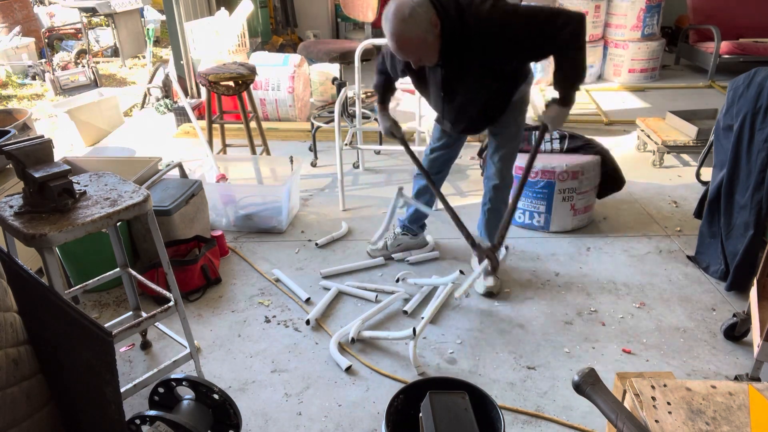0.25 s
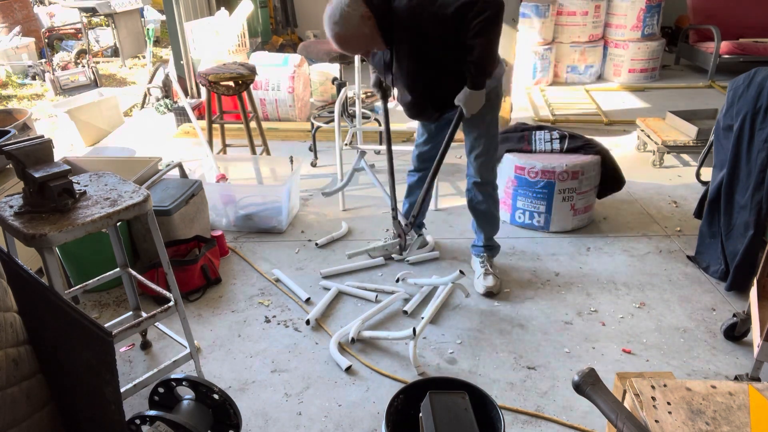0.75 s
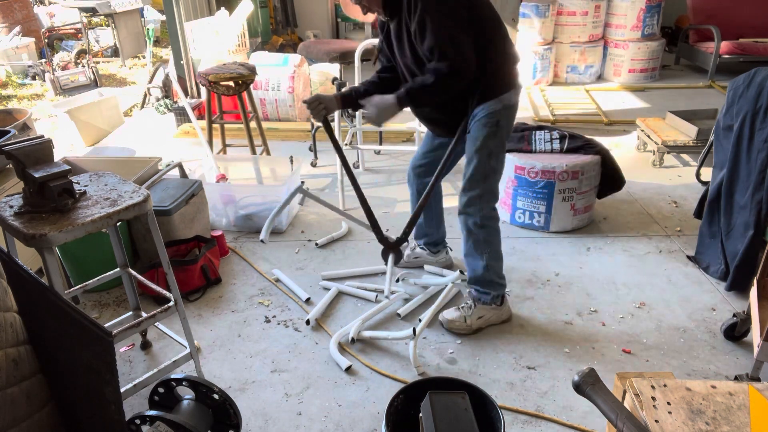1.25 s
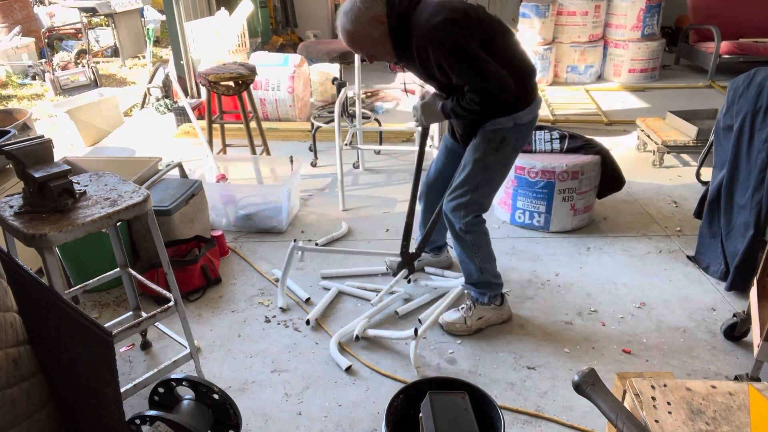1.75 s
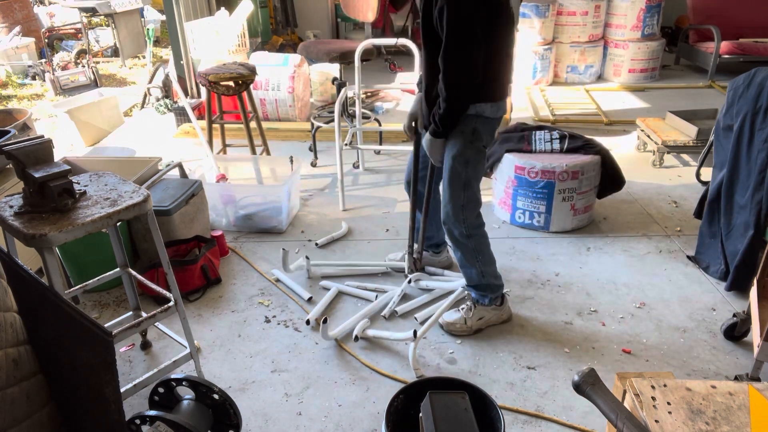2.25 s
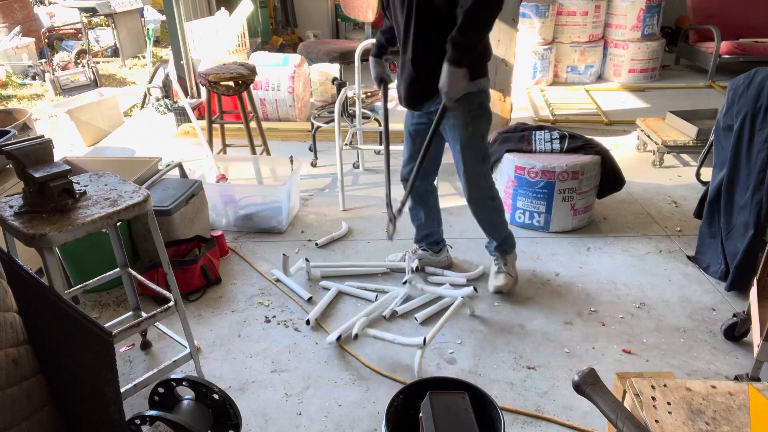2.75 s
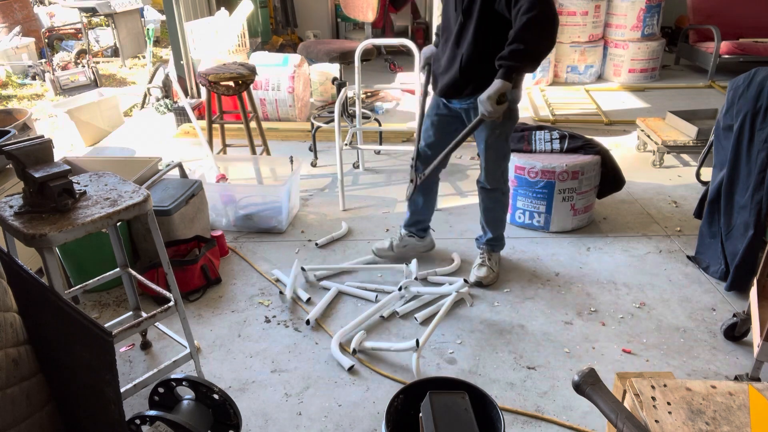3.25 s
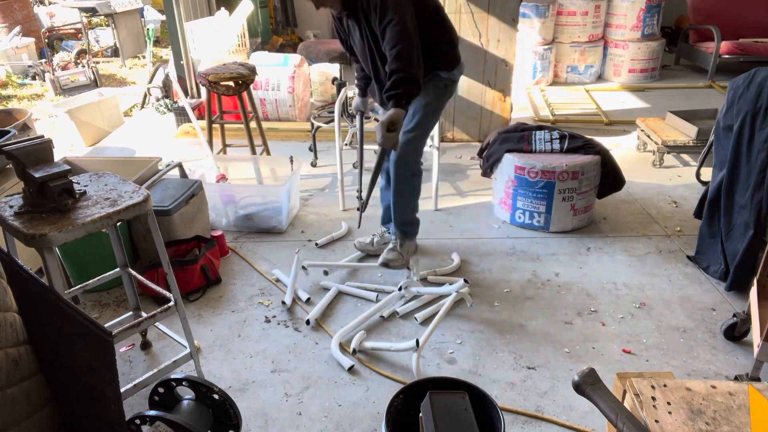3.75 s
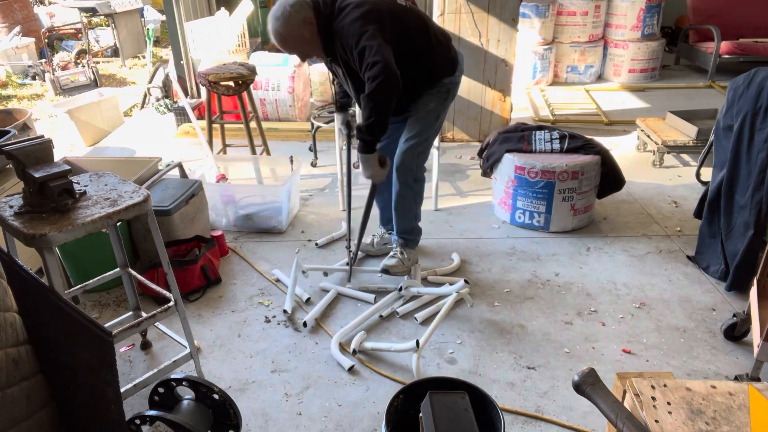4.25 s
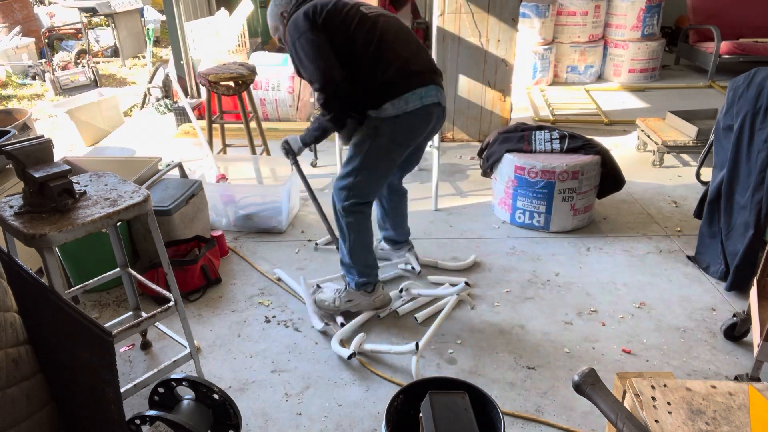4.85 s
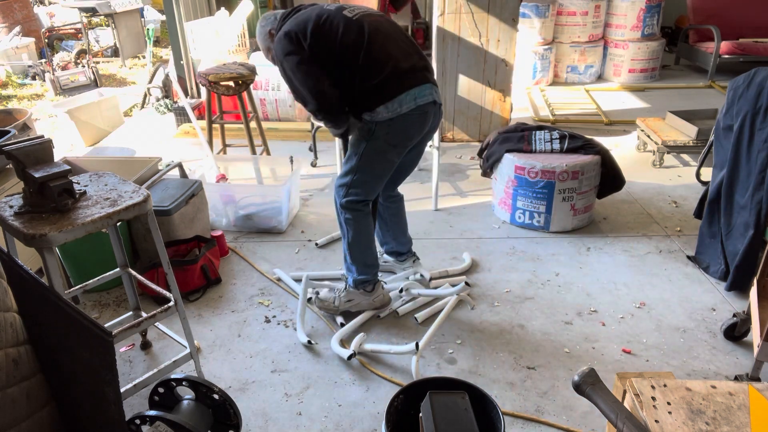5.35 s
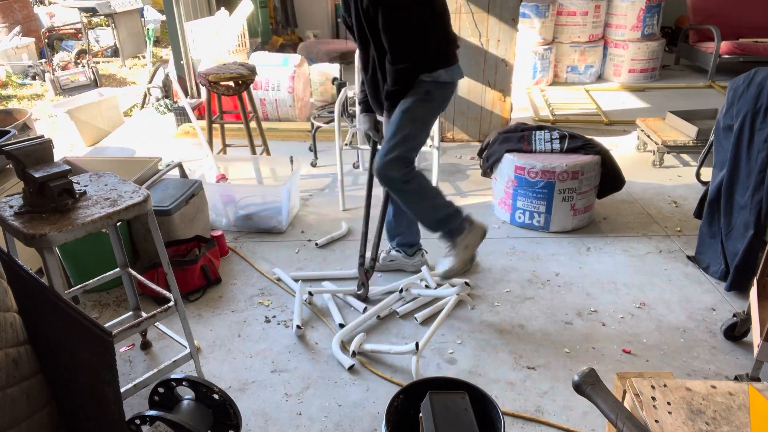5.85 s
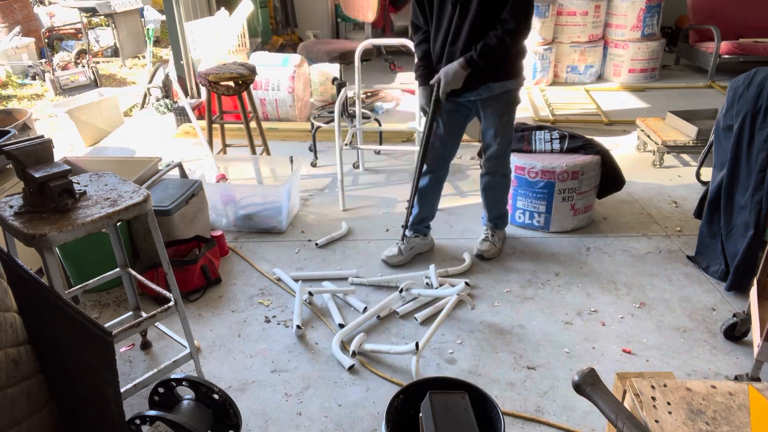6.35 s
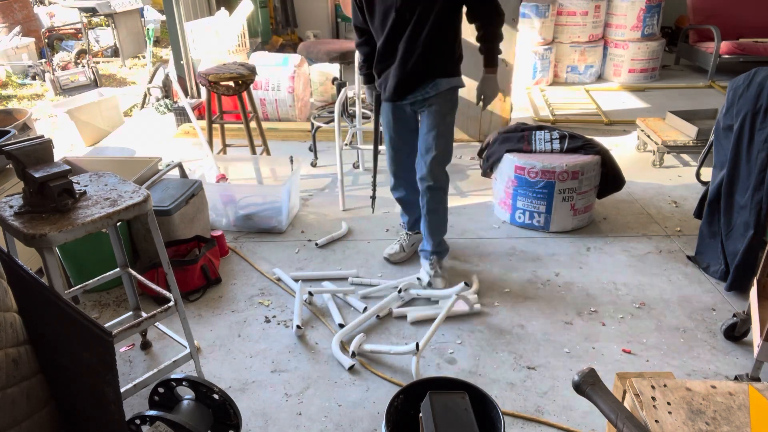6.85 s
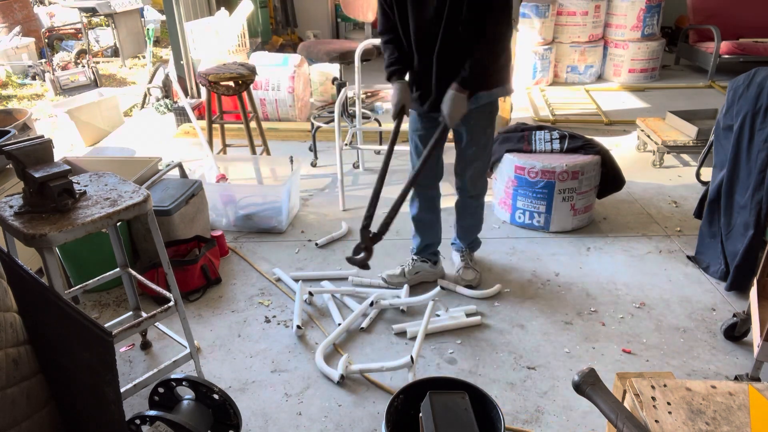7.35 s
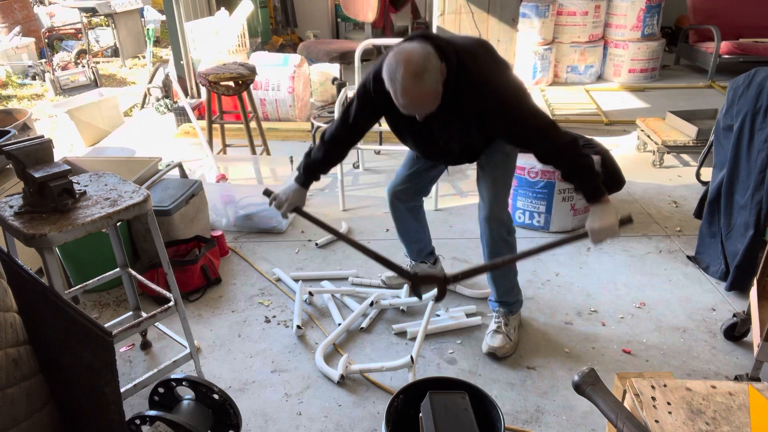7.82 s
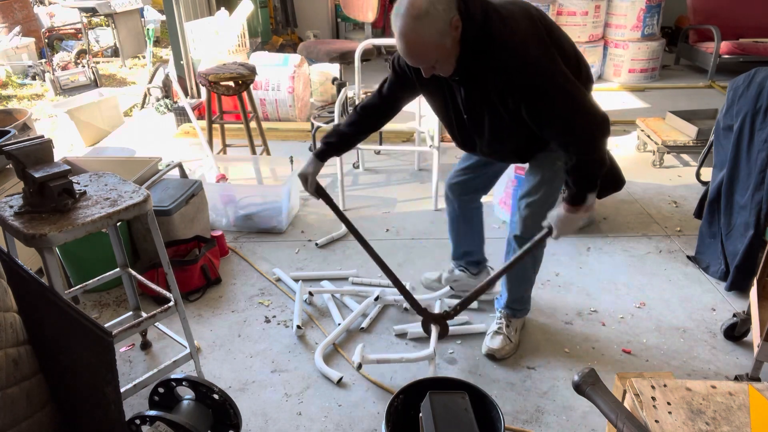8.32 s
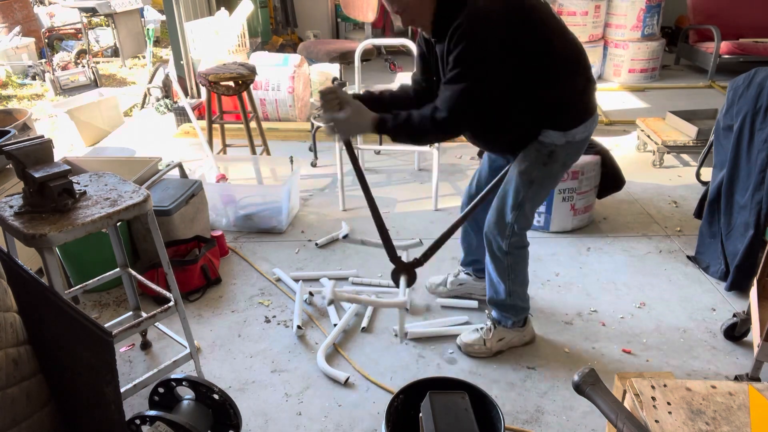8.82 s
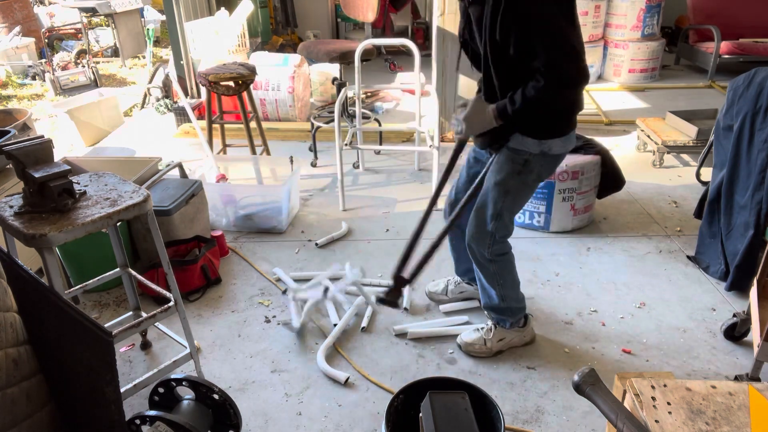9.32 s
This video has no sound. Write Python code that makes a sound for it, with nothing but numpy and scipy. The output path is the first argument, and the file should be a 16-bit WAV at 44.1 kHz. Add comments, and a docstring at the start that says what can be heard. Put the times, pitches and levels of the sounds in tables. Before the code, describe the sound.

Loose metal tubing clatters on a hard garage floor: first rattling and a ringing piece, then snappy knocks, scrapes and low soft thuds of weight. The busiest, loudest crashes fall in the middle, followed by lighter rattles and a long scrape, then fresh knocks and a final bright clank. The microphone is fairly near, with short reflections and quiet hiss underneath.

```python
"""Bolt cutters are worked through a heap of thin aluminium tubes on the concrete floor of a garage.
From the start a low wavering hum and faint hiss lie underneath, and the tubes drag, scrape and rattle;
the walls add a short tail. Almost at once single loose pieces ring on, as sums of beating modes, then
hard knocks make groups of tubes answer with a crack and many modes.
A little over a second in, dull thuds on the floor join them, as short low puffs of noise."""
import sys
import numpy as np
from scipy import signal
from scipy.fft import rfft, irfft, next_fast_len
from scipy.io import wavfile
from scipy.ndimage import uniform_filter1d

SR = 44100
rng = np.random.default_rng(int(sys.argv[2]) if len(sys.argv) > 2 else 0)


def gain_from_decibels(decibels):
    """Convert decibel values to linear amplitude factors."""
    exponent = np.asarray(decibels, float) / 20
    return 10 ** exponent


def inscribe(sig):
    """Save sig as 16-bit PCM at rate SR to the path in sys.argv[1].

    A 1-D sig is mono; a 2-D sig holds one channel per row.
    Samples are clipped to [-1, 1] before scaling.
    """
    pcm = np.round(np.clip(np.atleast_2d(sig).T, -1, 1) * 32767)
    wavfile.write(sys.argv[1], SR, pcm.astype(np.int16))


N = 422461   # length in samples


def at_hz(points, hz):
    """Read a table at the given pitches, on a log-frequency axis."""
    table_hz, value = np.transpose(points)
    return np.interp(np.log(hz), np.log(table_hz), value)


def ring(clicks, hz, t60):
    """A resonator: a unit click sets a sine of height 1 ringing, 60 dB down after t60 seconds."""
    r = gain_from_decibels(-60 / (t60 * SR))
    w = 2 * np.pi * hz / SR
    return signal.lfilter([0, np.sin(w)], [1, -2 * r * np.cos(w), r * r], clicks + 1e-18)


def band(x, low_hz, high_hz):
    """Butterworth band-pass."""
    return signal.sosfilt(signal.butter(2, [low_hz, high_hz], "band", fs=SR, output="sos"), x)


def sides(spread):
    """Left and right gains of something lying somewhere across the floor."""
    angle = np.pi / 4 + spread * rng.standard_normal()
    return np.sqrt(2) * np.array([[np.cos(angle)], [np.sin(angle)]])


# colour of the room noise, only its shape counts: (pitch_hz, level_db per Hz)
AIR_COLOUR = [(18, -71.5), (30, -28), (121, 1.5), (303, -11.5), (822, -13), (2350, -29), (3060, -45.5),
              (10200, -33), (16000, -62.5)]
AIR_DB, HUM_HZ, HUM_DB = -65.5, 192.3, -68


def air(apart):
    """Coloured room noise, partly shared by both sides, and a hum: a resonance kept going by noise."""
    mid, left, right = rng.standard_normal((3, N))
    colour = gain_from_decibels(at_hz(AIR_COLOUR, np.maximum(np.fft.rfftfreq(N, 1 / SR), 1)))
    noise = irfft(rfft(mid + apart * np.array([left, right])) * colour, N)
    hum = ring(rng.standard_normal(N), HUM_HZ, 0.047)
    return gain_from_decibels(AIR_DB) * noise / np.std(noise) + gain_from_decibels(HUM_DB) * hum / np.std(hum)


# the heap is stirred, by a drag that swells or at once by a knock, and settles (levels before later gains):
# (peak_s, swell_s, peak_db, settling_db_per_s, brightness_db)
STIRRINGS = [(0.002, 0.035, -35, 64.5, -1), (0.089, 0.3, -32, 205, -2.5), (0.899, 0.047, -58.5, 18, -17),
             (0.989, 0.012, -31.5, 81, -1), (1.086, 0.19, -31, 249.5, 1), (1.373, 0.2, -44, 275, -16),
             (1.633, 0.006, -42.5, 59, -6.5), (1.717, 0.01, -18.5, 112, -0.5),
             (1.96, 0.007, -13, 112.5, -1.5), (2.416, 0.0058, -37, 128, -23.5),
             (2.594, 0.064, -30.5, 402, -13.5), (2.68, 0.082, -23.5, 156, -12),
             (2.761, 0.0062, -19.5, 110, 1.5), (3.096, 0.0055, -33.5, 66.5, -6),
             (3.224, 0.0054, -44, 63, 2.5), (3.449, 0.01, -23, 238, -1.5), (3.777, 0.0035, -31, 79, -13),
             (3.828, 0.084, -30, 247, -6.5), (4.057, 0.0055, -38.5, 19.5, -30),
             (4.138, 0.12, -30.5, 217, 15.5), (4.285, 0.1, -28.5, 117, -3.5),
             (4.51, 0.0049, -31.5, 35, -10), (4.637, 0.31, -26, 74.5, -8), (4.921, 0.27, -23, 99.5, -4),
             (5.253, 0.033, -38.5, 383, -11.5), (5.384, 0.0067, -21.5, 70, -5), (5.453, 0.53, -36, 119, -7),
             (5.726, 0.0059, -27, 110.5, -6), (5.866, .008, -31.5, 135.5, -23),
             (6.034, 0.014, -40.5, 55, -3.5), (6.121, 0.18, -39, 134.5, -14), (6.351, 0.21, -41, 72, -9),
             (6.539, 0.0071, -41.5, 253, -20), (6.609, 0.039, -49, 263.5, -4),
             (6.75, .012, -46.5, 37.5, -10), (6.783, 0.0044, -20.5, 70.5, 3.5),
             (6.979, 0.33, -27, 311, 0.5), (7.155, 0.86, -29.5, 500, -6.5),
             (7.353, 0.0058, -50.5, 42.5, -6.5), (7.956, 0.0047, -20.5, 87, 0),
             (8.147, 0.093, -21.5, 86, -4.5), (8.22, 0.22, -19.5, 295, -5),
             (8.339, 0.0081, -21, 350, -12.5), (8.42, 0.007, -21.5, 190, -3.5),
             (8.895, 0.16, -44.5, 165, -8.5), (9.207, 0.0089, -40, 99, -12), (9.32, 0.0042, -22.5, 48.5, 1)]
SWELL_DB = 40   # a stir climbs this much during its swell
DRAG_DB, DRAG_SHARE = -38, .7   # stirs gentler than this mostly scrape without ringing, up to this share


def stirring(t):
    """Power of every stir at times t, the mean brightness in dB and the share of each that scrapes."""
    s, swell_s, peak_db, settling, bright_db = np.transpose(STIRRINGS)[:, :, None]
    after = t - s
    slope = np.where(after < 0, SWELL_DB / swell_s, -settling)   # dB per s
    level_db = np.maximum(peak_db + slope * after, -200)
    power = gain_from_decibels(level_db) ** 2 * (after > -swell_s) + 1e-20
    mean_bright_db = (power * bright_db).sum(axis=0) / power.sum(axis=0)
    scraping = DRAG_SHARE / (1 + gain_from_decibels(peak_db - DRAG_DB) ** 2)
    return power, mean_bright_db, scraping


def scrape(gain_db, catch_db, apart):
    """Tubes held down by friction hiss over the concrete, catching unevenly: low and high part, in stereo."""
    coarse = np.arange(0, N, 64)
    power, bright_db, scraping = stirring(coarse / SR)
    catching = catch_db * uniform_filter1d(rng.standard_normal(len(coarse)), size=4) * 2
    level_db = 10 * np.log10((power * scraping).sum(axis=0)) + gain_db + catching
    mid, side = rng.standard_normal((2, N))
    hiss = mid + apart * side * [[1], [-1]]
    return [hiss * np.interp(np.arange(N), coarse, gain_from_decibels(level_db + shine_db))
            for shine_db in (0, bright_db)]


def contacts(per_s, uneven_db):
    """Small contacts of rattling tubes: sample, dB, brightness dB. Overlapping stirs add their power."""
    at = np.flatnonzero(rng.random(N) < per_s / SR)
    power, bright_db, scraping = stirring(at / SR)
    size_db = uneven_db * np.minimum(rng.exponential(1, N), 4)[at]
    level_db = 10 * np.log10((power * (1 - scraping)).sum(axis=0)) + size_db
    return at, level_db, bright_db


# typical time in which the heap's modes fall by 60 dB: (pitch_hz, ring_s)
HEAP_RING = [(300, 0.087), (2000, 0.072), (14000, 0.097)]


def tube_group(count, scatter_db, crack_db, crack_s, apart):
    """A group's answer to a click: a broad crack and many modes, each side with its own phase."""
    t = np.arange(int(.3 * SR), dtype=np.float32) / SR
    hz = rng.uniform(np.sqrt(250), np.sqrt(15800), count) ** 2
    t60 = at_hz(HEAP_RING, hz) * gain_from_decibels(rng.normal(0, 1.5, count))
    even = np.sqrt(np.sqrt(hz) / t60)   # even energy per Hz
    size = gain_from_decibels(rng.uniform(-scatter_db, scatter_db, count)) * even
    lag = apart * np.minimum(hz / 4000, 1) * rng.standard_normal(count)
    turn = np.float32(2 * np.pi * hz[:, None]) * t
    dying = np.exp(np.float32(-np.log(1000) / t60[:, None]) * t)
    sine = np.float32(size * np.cos(lag)) @ (np.sin(turn) * dying)
    cosine = np.float32(size * np.sin(lag)) @ (np.cos(turn) * dying)
    modes = np.array([sine + cosine, sine - cosine])
    crack = rng.standard_normal((2, len(t))) * np.exp(-t / crack_s)
    return modes / np.linalg.norm(modes) + gain_from_decibels(crack_db) * crack / np.linalg.norm(crack)


# knocks in the heap, levels before the gain knock_db: (start_s, level_db, brightness_db)
HEAP_KNOCKS = [(0.149, -18.5, -1.5), (0.991, -14.5, -2), (1.087, -14.5, -2), (1.635, -23.5, -1),
               (1.714, -15.5, -3), (2.199, -9.5, -21), (2.676, -28, -6.5), (2.761, -18, -10),
               (2.83, -9, -0.5), (3.096, -14.5, -6.5), (3.222, -18, -8.5), (3.263, -25.5, 2.5),
               (3.377, -27, -19), (3.445, -16, -2), (3.813, -12, -10), (4.061, -5.5, -7.5),
               (4.094, -5, -12), (4.123, -2.5, -14.5), (4.132, -23.5, 16.5), (4.192, -16, 3),
               (4.281, -19, -18), (4.473, -25, -10.5), (4.832, -9, -11), (4.92, -10, -1.5),
               (5.383, -4.5, -12.5), (5.454, -10, 1), (5.73, -11, 7.5), (6.116, -31.5, 12),
               (6.782, -11, -6), (7.351, -15.5, -15.5), (7.451, -28, -8), (7.932, -19, -10.5),
               (7.952, -5.5, -3), (8.339, -19.5, -0.5), (8.418, -15.5, 1), (9.211, -25, -10),
               (9.325, -6, 1), (9.35, -6.5, -3), (9.455, -16.5, 3)]
# colour of the heap, as a filter: (pitch_hz, level_db)
HEAP_COLOUR = [(120, -42.5), (200, -27.5), (1090, -10.5), (1880, -6), (3240, -5), (5800, -2.5),
               (15500, -10.5)]


def heap(count, knock_db, knock_s, rattle_db, split_hz):
    """Scrapes, and knocks and small contacts dealt to groups of tubes, which ring in answer."""
    s, peak_db, bright_db = np.transpose(HEAP_KNOCKS)
    at, level_db, shine_db = contacts(per_s=2600, uneven_db=3.5)
    size = next_fast_len(N + SR)
    hz = np.maximum(np.fft.rfftfreq(size, 1 / SR), 1)
    high = np.clip(np.log2(hz / split_hz), 0, 1)   # brightness acts on the upper modes
    # other tubes touch from moment to moment
    group = rng.integers(0, count, N // 2500 + 1)[at // 2500]
    touch, grit = rng.standard_normal((2, N))
    low, up = rfft(scrape(gain_db=13.5, catch_db=3.5, apart=.7), size)
    out = low * (1 - high) + up * high
    knock_gain = gain_from_decibels(peak_db + knock_db + np.array([0 * s, bright_db]))
    touch_gain = gain_from_decibels(level_db + rattle_db + np.array([0 * at, shine_db]))
    knock_dying = np.exp(-1 / (knock_s * SR))
    for k in range(count):
        force = np.zeros((2, N))   # low and high part of the force
        mine = np.arange(len(s)) % count == k
        force[:, (s[mine] * SR).astype(int)] = knock_gain[:, mine]
        # a knock is a short gritty burst
        force = grit * signal.lfilter([1], [1, -knock_dying], force + 1e-18)
        force[:, at] += (group == k) * touch[at] * touch_gain
        low, up = rfft(force, size)
        answer = tube_group(count=110, scatter_db=15.5, crack_db=-7, crack_s=0.0033, apart=1.0)
        out = out + (low * (1 - high) + up * high) * rfft(answer, size)
    return irfft(out * gain_from_decibels(at_hz(HEAP_COLOUR, hz)), size)[:, :N]


GARAGE_T60_S, GARAGE_DB, GARAGE_CUT_HZ = .4, -10.5, 10700


def garage(x):
    """Diffuse tail: dying noise, its own on each side, dulled by the walls."""
    t = np.arange(int(GARAGE_T60_S * SR)) / SR
    tail = rng.standard_normal((2, len(t))) * gain_from_decibels(-60 * t / GARAGE_T60_S) * (t > .004)
    tail = band(tail, 85, GARAGE_CUT_HZ)
    tail /= np.sqrt(np.sum(tail ** 2, axis=1, keepdims=True))
    return gain_from_decibels(GARAGE_DB) * signal.fftconvolve(x.mean(axis=0, keepdims=True), tail, axes=1)[:, :N]


# modes of each loose piece, by letter; ring_s is the time to fall 60 dB: (pitch_hz, level_db, ring_s)
PIECE_MODES = {"a": [(703, -12, .8), (947, -6, .65), (1899, 0, .62), (2437, -3, .2), (3027, -4, .3),
               (3245, -4, .15)], "b": [(1922, 0, .55), (3745, 0, .3), (5851, 0, .22), (7928, -6, .25)],
               "g": [(1920, 0, .68), (3950, 0, .4), (5510, 0, .35), (7900, -3, .3)], "h": [(503, 0, .6),
               (660, -8, .55)], "c": [(1525, 0, .32), (2938, 0, .36), (4951, 0, .26)], "d": [(1858, 0, .25),
               (2713, -3, .3), (3664, 0, .33), (4033, -2, .29), (4640, -8, .18)], "e": [(1557, 0, .4),
               (2248, -4, .22), (3000, 0, .3), (5130, 0, .16), (5591, -3, .22), (6169, -6, .3)],
               "f": [(708, 0, .17), (865, 0, .36), (1100, 0, .6), (1300, 0, .4)]}
# loose pieces struck: (start_s, piece, level_db, pitch the blow favours in octaves above 250 Hz)
PIECE_STRIKES = [(0.01, "a", -27, 3.25), (0.065, "a", -30, 3.7), (0.145, "a", -28, 2.9),
                 (0.147, "a", -43, 1.95), (0.998, "b", -38, 2.9), (1.063, "b", -27, 3.9),
                 (1.08, "b", -37, 2.9), (1.078, "b", -21, 4.5), (1.736, "f", -30, 1.5),
                 (1.745, "b", -23, 3.9), (1.98, "c", -24, 2.6), (2.02, "c", -28, 4.2),
                 (2.68, "c", -26, 3.55), (2.7, "f", -35, 2.15), (2.77, "c", -20, 3.55),
                 (2.78, "e", -23, 3.15), (2.829, "d", -30, 2.8), (2.83, "d", -29, 3.8),
                 (3.79, "f", -41, 1.8), (4.135, "d", -27, 3.9), (4.19, "d", -34, 2.9),
                 (4.65, "b", -34, 2.9), (4.758, "e", -29, 3.15), (4.93, "d", -29, 3.75),
                 (4.95, "b", -36, 2.9), (5.393, "e", -24, 3.6), (5.448, "e", -25, 2.6),
                 (5.453, "e", -22, 4.4), (5.454, "e", -26, 3.6), (5.727, "d", -18, 2.95),
                 (5.728, "d", -26, 4.1), (6.035, "d", -38, 3.75), (6.78, "b", -23, 5.1),
                 (6.795, "b", -23, 4.3), (7.079, "g", -32, 4.2), (7.135, "g", -32, 2.9),
                 (7.955, "h", -49, .9), (7.99, "b", -28, 3.9), (8.137, "e", -27, 3.6),
                 (8.45, "h", -45, 1.05), (9.322, "e", -19, 3.45), (9.325, "e", -23, 4.5),
                 (9.339, "e", -24, 2.8), (9.369, "b", -26, 2.9), (9.4, "e", -25, 3.4),
                 (9.463, "e", -25, 4.7), (9.47, "f", -34, 2.5)]
FAVOUR_DB = 50   # loss of a mode one octave from the favoured pitch; grows with the square
# a knock listed above this level, this long after a strike, throws a ringing piece
# against the others and dulls it by this loss
SHAKE_DB, SHAKE_AFTER_S, SHAKE_LOSS_DB = -11, .04, 10


def free_pieces(rise_s, split, twin, rough_db, hastening):
    """Tubes not quite round: modes beat with close neighbours, waver as the piece rattles free,
    and die slowly at first, then ever faster."""
    out = np.zeros((2, N))
    shakes = np.array([s for s, db, _ in HEAP_KNOCKS if db > SHAKE_DB] + [N / SR])
    for s, piece, blow_db, favoured in PIECE_STRIKES:
        start, place = int(s * SR), sides(0.051)
        shaken = shakes[shakes > s + SHAKE_AFTER_S][0] - s
        for hz, mode_db, t60 in PIECE_MODES[piece]:
            level_db = blow_db + mode_db - FAVOUR_DB * (np.log2(hz / 250) - favoured) ** 2
            if level_db <= -70:   # too faint to matter
                continue
            t = np.arange(min(int(t60 * SR), N - start)) / SR
            above, below = 2 * np.pi * hz * split * rng.uniform(.3, 1.5, 2)
            beating = 1 + twin * (np.exp(1j * above * t) + np.exp(-1j * below * t))
            tone = np.imag(beating * np.exp(2j * np.pi * (hz * t + rng.random())))
            wobble = np.interp(t * 70, np.arange(200), rng.standard_normal(200))   # 70 new values a second
            waver_db = rough_db * np.exp(-t / 0.2) * wobble
            shake_db = SHAKE_LOSS_DB * np.clip((t - shaken) / rise_s, 0, 1)
            dying_db = 60 * (t / t60) ** hastening + shake_db
            height = (1 - np.exp(-t / rise_s)) * gain_from_decibels(level_db + waver_db - dying_db)
            out[:, start:start + len(t)] += place * tone * height
    return out


# dull thuds of weight coming down on the floor, levels before the gain gain_db: (start_s, level_db)
FLOOR_THUDS = [(1.237, -37), (1.73, -33), (2.142, -18.5), (4.059, -37), (4.129, -19), (4.285, -23.5),
               (4.837, -27), (5.318, -26), (5.382, -8.5), (5.738, -36), (7.344, -34), (7.667, -36.5),
               (8.445, -20.5), (8.638, -30.5), (9.214, -39), (9.409, -15.5)]


def thuds(gain_db, thud_s, low_hz, high_hz):
    """Weight on the floor: short low puffs of noise that die away at once."""
    s, peak_db = np.transpose(FLOOR_THUDS)
    dull = np.zeros(N)
    dull[(s * SR).astype(int)] = gain_from_decibels(peak_db + gain_db)
    dying = signal.lfilter([1], [1, -np.exp(-1 / (thud_s * SR))], dull + 1e-18)
    return band(dying * rng.standard_normal(N), low_hz, high_hz)


def scene():
    """Tubes in the garage over the room noise."""
    tubes = heap(count=11, knock_db=10.5, knock_s=0.0042, rattle_db=19.0, split_hz=1610)
    tubes += thuds(gain_db=4.5, thud_s=0.013, low_hz=215, high_hz=763)
    tubes += free_pieces(rise_s=.005, split=.006, twin=.35, rough_db=3.5, hastening=1.7)
    return tubes + garage(tubes) + air(apart=0.46)


def roll_off(x):
    """The treble ends steeply here."""
    return signal.sosfilt(signal.butter(12, 16650, fs=SR, output="sos"), x)


def record(dry):
    """The left port hears one sample later; deep bass is cut, peaks are rounded and the top is cut."""
    mix = np.array([np.roll(dry[0], 1), dry[1]])
    mix = signal.sosfilt(signal.butter(3, 62, "high", fs=SR, output="sos"), mix)
    mix = .8 * np.tanh(mix / .8)
    mix = signal.sosfilt(signal.cheby2(10, 60, 16500, fs=SR, output="sos"), mix)
    return roll_off(mix)


dry = scene()
out = record(dry)
inscribe(out)
```